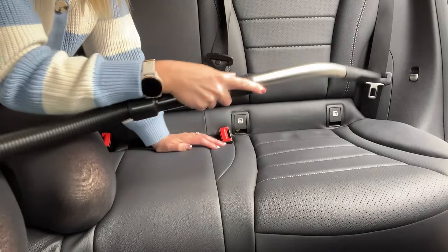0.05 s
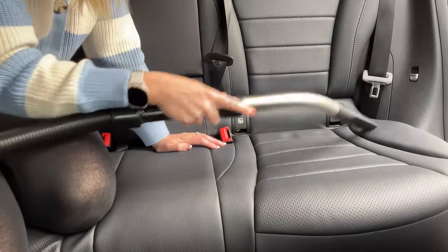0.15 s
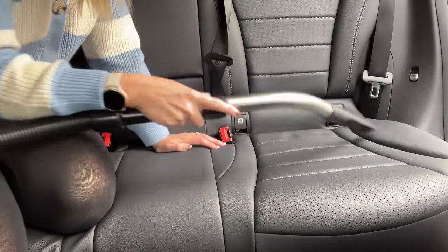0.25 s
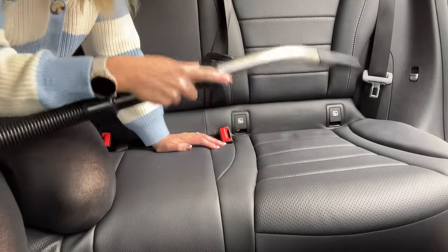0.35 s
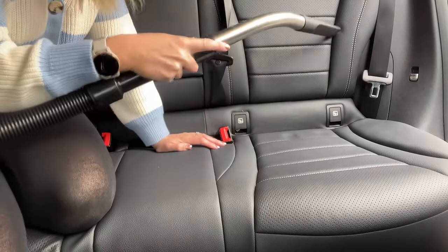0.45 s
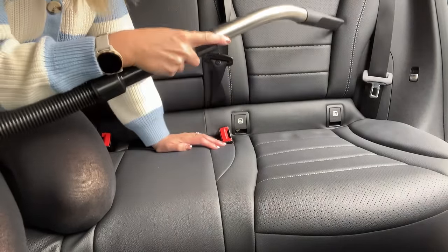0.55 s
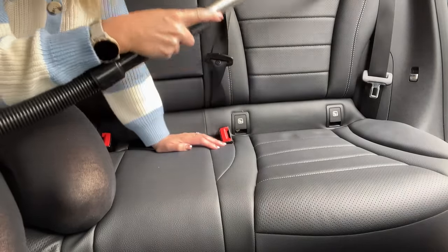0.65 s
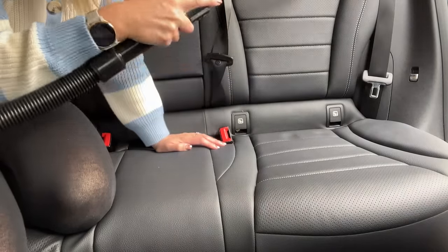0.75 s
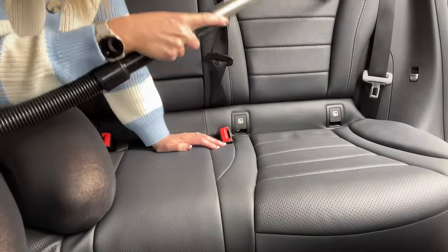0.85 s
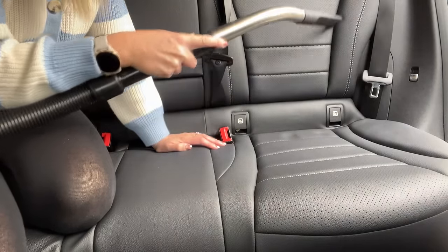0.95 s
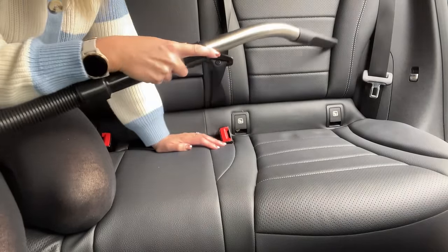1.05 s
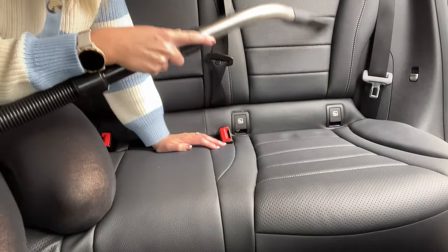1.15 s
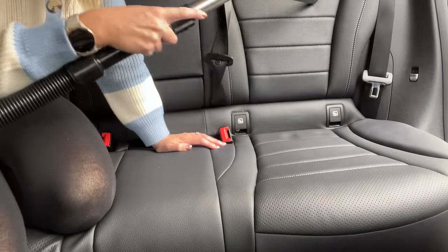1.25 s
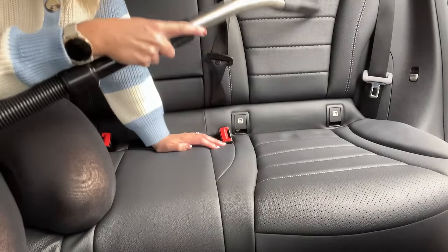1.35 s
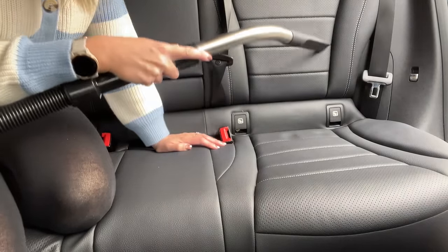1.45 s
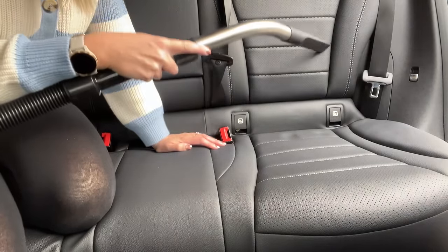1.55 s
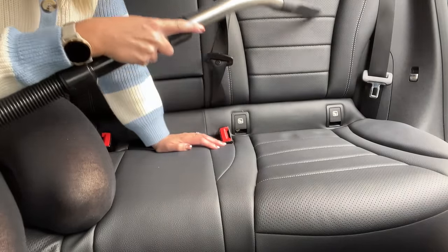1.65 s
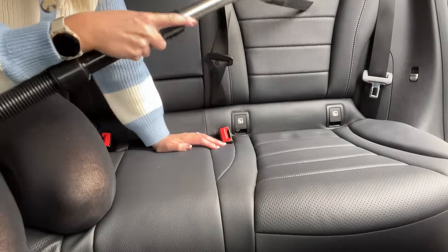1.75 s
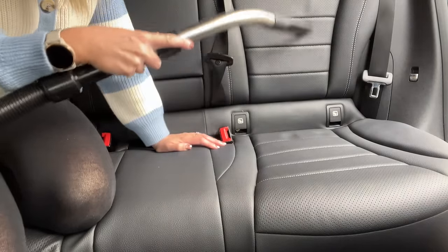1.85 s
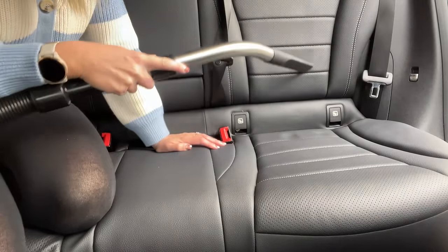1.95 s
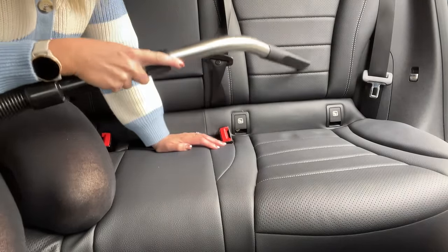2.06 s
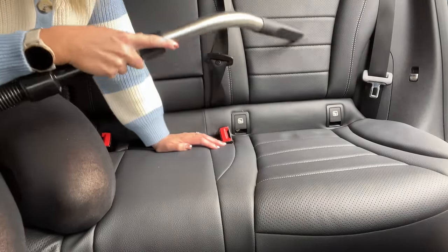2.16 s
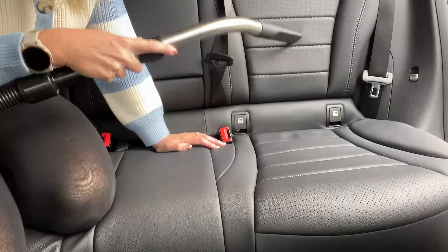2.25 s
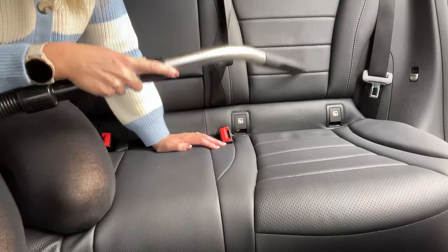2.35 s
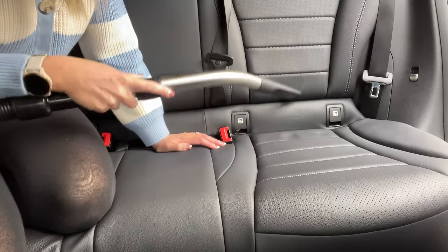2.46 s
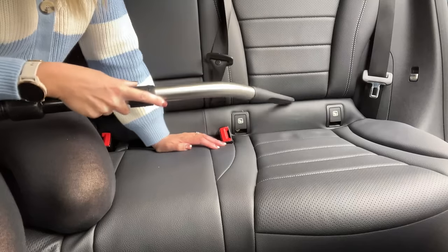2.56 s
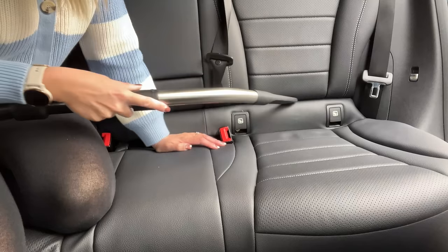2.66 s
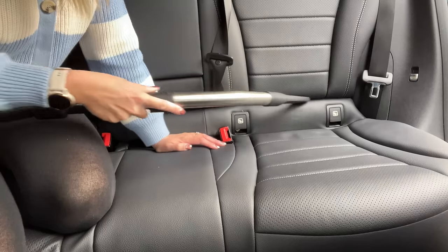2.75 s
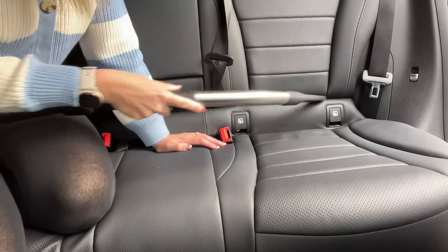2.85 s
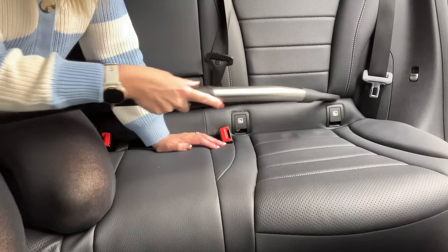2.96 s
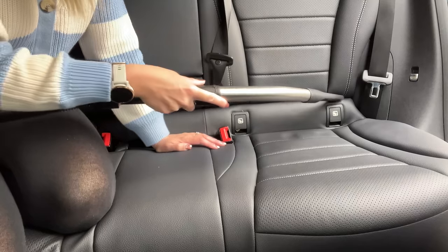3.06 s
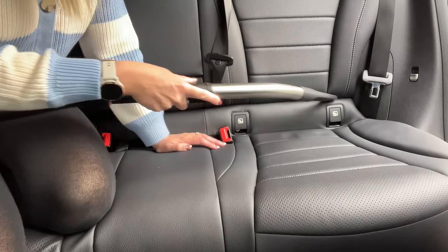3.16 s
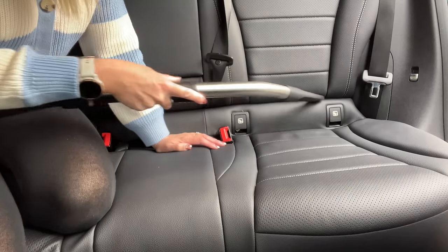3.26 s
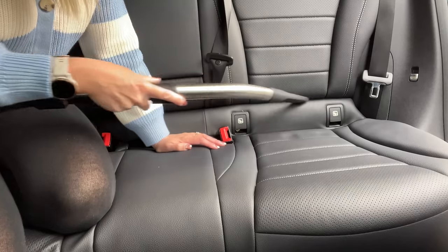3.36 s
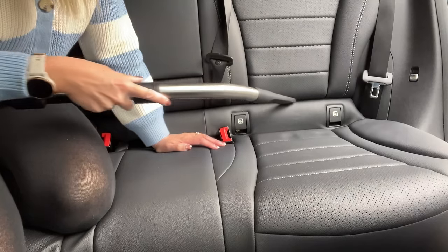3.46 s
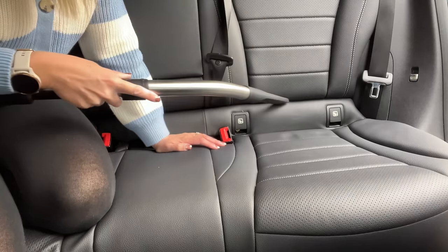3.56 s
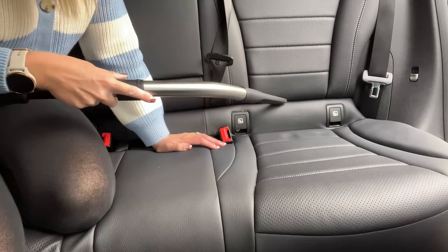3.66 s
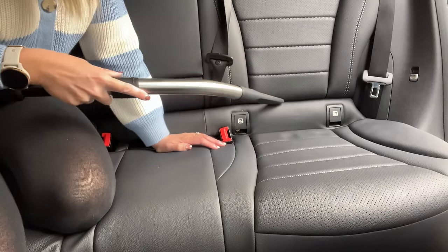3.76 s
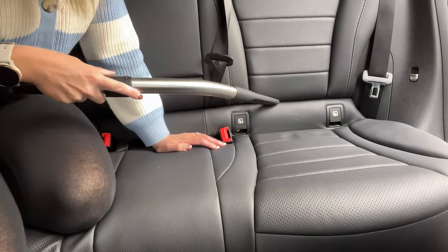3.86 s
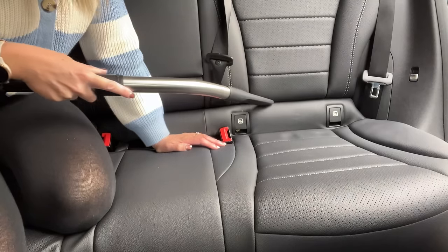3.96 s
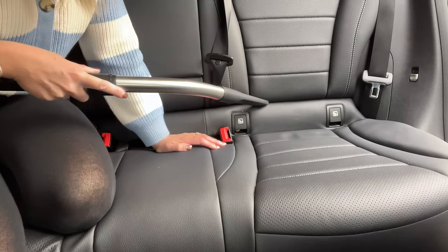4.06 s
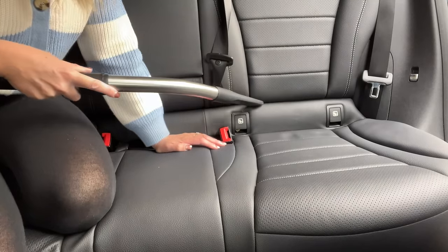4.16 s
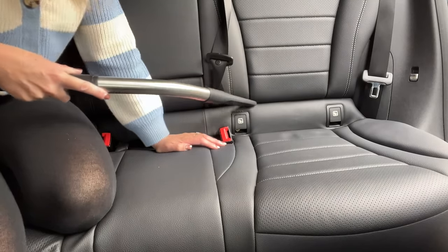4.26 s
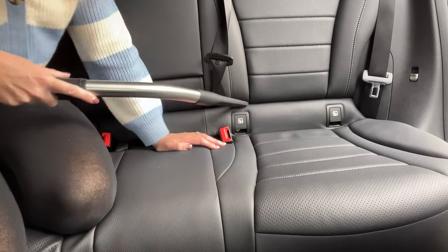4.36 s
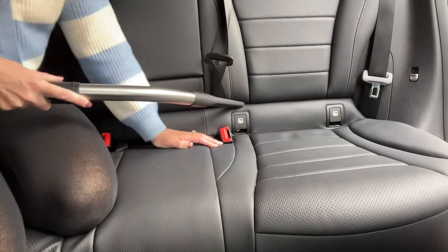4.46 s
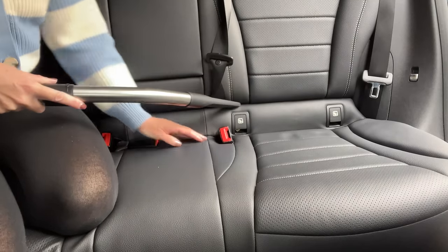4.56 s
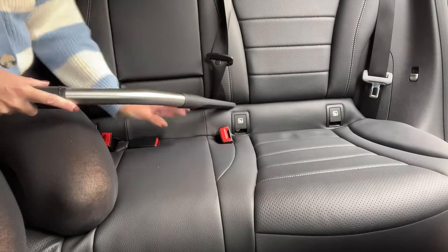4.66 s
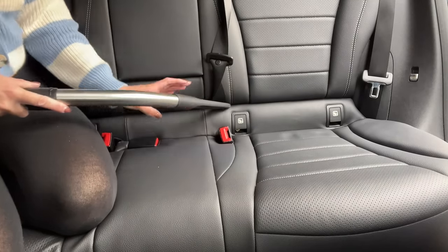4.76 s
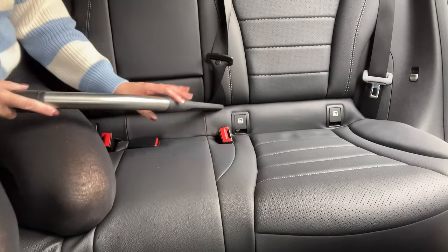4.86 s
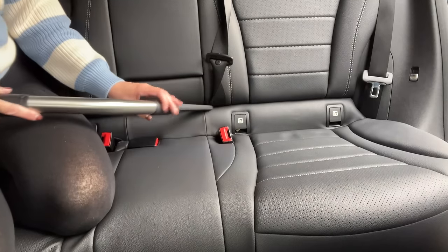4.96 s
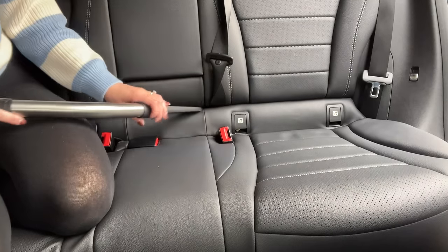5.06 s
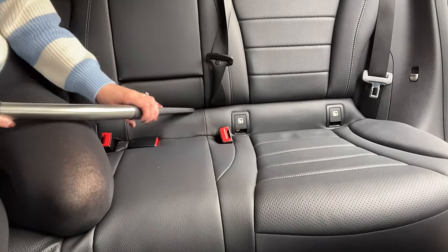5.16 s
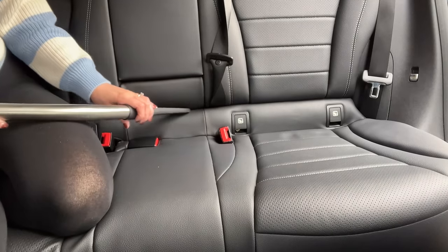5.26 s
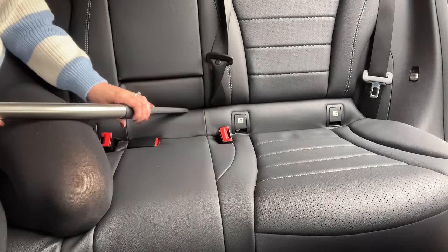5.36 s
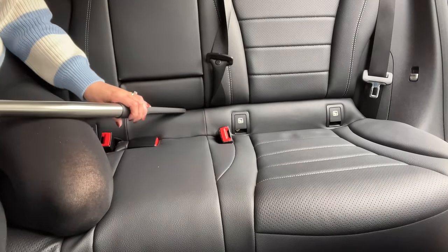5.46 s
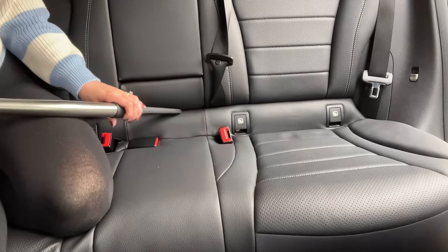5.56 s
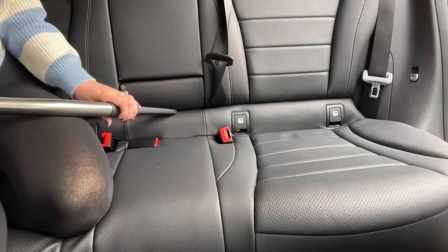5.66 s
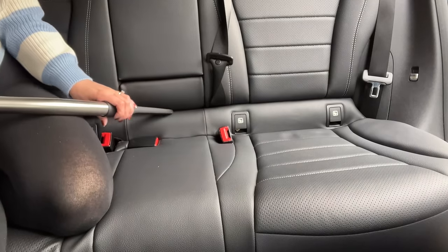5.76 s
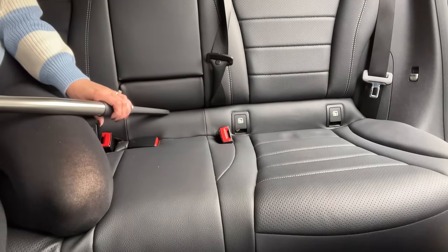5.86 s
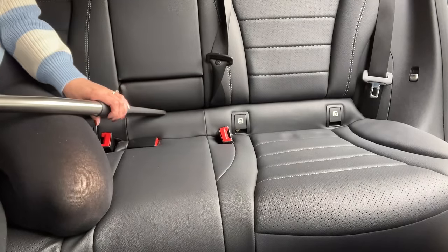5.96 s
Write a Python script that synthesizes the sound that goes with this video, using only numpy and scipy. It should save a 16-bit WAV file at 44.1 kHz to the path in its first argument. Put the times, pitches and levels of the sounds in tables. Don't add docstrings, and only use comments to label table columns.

```python
import sys
import numpy as np
from scipy import signal
from scipy.fft import rfft, irfft
from scipy.io import wavfile
from scipy.ndimage import map_coordinates

SR = 44100
rng = np.random.default_rng(int(sys.argv[2]) if len(sys.argv) > 2 else 0)


def generate_wav(sig):
    pcm = np.round(np.clip(np.atleast_2d(sig).T, -1, 1) * 32767).astype(np.int16)
    wavfile.write(sys.argv[1], SR, pcm)


def to_linear_factor(level_db):
    exponent = np.asarray(level_db, float) / 20
    return 10 ** exponent


N = 265041
T = np.arange(N) / SR

# t/s, flow heard as hiss level/dB, gap width as coarse rush over hiss/dB
FLOW = [(0, -45, 11), (.06, -44, -7.5), (.3, -38, -2), (.8, -37, -12), (1.3, -41, -10), (1.8, -40, -15),
        (2.3, -40.5, -13), (2.52, -32.5, -14.5), (2.56, -33.5, -8.5), (2.8, -30, -15.5), (3.05, -28.5, -6),
        (3.45, -30.5, -12), (3.7, -28, -11), (4.34, -26.5, -14.5), (4.38, -31, -11.5), (4.85, -25, -8.5),
        (5.2, -23.5, -6), (6.01, -22, -14.5)]
# t/s, length/s, hiss level/dB, coarse rush level/dB
TOUCHES = [(.055, 0.095, 13, 12), (.17, 0.11, 13.5, 7), (.33, 0.22, 1.5, 1.5), (.455, 0.17, 10.5, 15),
           (.61, 0.082, 8, 15.5), (.87, 0.082, 4, 12), (.93, 0.021, 14.5, 18), (.96, 0.27, 16, 26),
           (1.14, 0.079, -2.5, -3.5), (1.395, 0.053, 11, 12), (1.46, 0.18, 11, 17), (1.595, 0.12, 6, 5.5),
           (1.85, .04, 3.5, 4), (1.92, 0.074, 4.5, 7.5), (2.005, 0.16, 9.5, 12.5), (2.15, 0.037, 10.5, 12),
           (2.32, 0.024, -1, -12), (2.4, 0.04, 10, 5), (2.46, 0.042, 4, 3), (2.54, 0.12, 7, 1.5),
           (2.93, 0.069, 3, 8), (3.08, 0.13, 2.5, 1), (3.14, 0.15, 3.5, 9), (3.38, .04, -0.5, -1),
           (3.515, 0.092, 5, 17.5), (3.68, 0.067, 2.5, 3.5), (3.95, 0.26, -2, -2), (4.83, 0.11, 2, 4.5),
           (5.0, 0.092, 5.5, 0), (5.2, 0.084, 3, 1.5), (5.66, 0.11, -0.5, -1.5), (5.76, 0.02, 2.5, 1),
           (4.63, 0.034, 3.5, 1.5), (.7, 0.027, 5, 0), (.75, 0.097, -2, 1), (1.21, .03, 2, 2),
           (1.34, 0.044, 0, 3), (1.73, 0.13, -0.5, -6), (4.38, 0.14, 0.5, 1.5), (5.5, 0.17, 2, 1.5)]
# t/s, length/s, roar level/dB
SEALS = [(.1, 0.35, 13.5), (.22, 0.11, -3.5), (.46, 0.08, 3.5), (.56, 0.15, 3), (.65, 0.035, 8.5),
         (.9, 0.37, 10.5), (1.41, 0.31, 10), (1.6, 0.032, 4.5), (1.85, 0.032, 6), (1.93, 0.11, 6.5),
         (2.03, 0.13, 7), (2.15, 0.02, 7), (2.32, 0.032, 6.5), (2.385, 0.061, 14), (2.46, 0.061, 14),
         (2.5, 0.028, 2), (2.98, 0.18, 10), (3.53, 0.038, 8), (4.99, 0.081, 11)]
LAYER_HZ = [700, 2500, 6500, 14000]
# f/Hz, level/dB per Hz
STREAM_COLOUR = [(200, -19), (280, -11.5), (400, -0.5), (600, -6), (900, -3.5), (1400, -2.5), (2000, -1.5),
                 (3500, -3.5), (5500, -6), (8000, -6.5), (10000, -8.5), (13000, -9.5), (14500, -13.5),
                 (16000, -39)]
# t/s, lower f/Hz, level/dB, upper f/Hz, level/dB
CAVITY = [(0, 6800, 0.5, 11200, 4.5), (.36, 6700, -5, 12500, 2), (.6, 6000, 1, 11500, 1.5),
          (1.0, 5700, 0, 10000, 1.5), (2.4, 7500, -5, 11300, -2), (2.6, 7550, 5, 16000, 13.5),
          (2.85, 9400, 8, 14700, 5), (3.05, 9200, 4.5, 12100, 7), (3.3, 9350, 7.5, 14600, 7),
          (3.55, 7240, 8.5, 13700, 7.5), (3.75, 7800, 4.5, 13300, 5.5), (3.95, 7100, 7, 13200, 9),
          (4.3, 6560, 4.5, 13200, 2.5), (4.55, 7750, 7, 11900, 3.5), (4.8, 9100, 2.5, 11200, 1.5),
          (5.1, 7300, 5, 10900, 2.5), (5.6, 8460, 7, 11000, -1), (6.01, 8200, 2, 14000, -10)]
# t/s, length/s, level/dB
LOWER_SWELLS = [(.1, 0.073, 6), (.3, 0.083, -6), (.6, 0.31, 4.5), (1.08, 0.075, -0.5), (1.44, 0.1, -3.5),
                (1.95, 0.3, -6), (2.46, 0.11, 2), (2.92, 0.24, -5), (3.5, 0.07, 1), (3.98, 0.082, 2),
                (4.63, 0.083, 1), (4.82, 0.093, -1), (4.95, .06, 0), (5.55, .1, -1.5)]
# t/s, length/s, level/dB
UPPER_SWELLS = [(.45, 0.095, -2.5), (.72, 0.25, 0), (1.04, 0.13, 0.5), (1.26, .1, 1.5), (1.74, .08, -7),
                (1.96, 0.11, 3), (2.45, 0.069, 2), (2.74, 0.31, 2), (3.34, 0.083, 0), (3.98, 0.35, 2.5),
                (5.55, 0.31, 1)]
# t/s, level/dB, length/s
PUFFS = [(0.134, 11, 0.0095), (0.374, 2, 0.027), (2.412, 5, .008), (5.49, 2, 0.014), (5.615, -4, 0.013),
         (5.646, -3, 0.013), (5.78, 2.5, .025), (5.808, -3.5, 0.03), (5.977, -0.5, 0.016),
         (0.27, 6.5, 0.013), (0.476, 4.5, 0.069), (1.699, 9.5, 0.031), (1.88, 11, 0.01), (1.94, 8, 0.012),
         (2.171, 4.5, 0.0072), (2.343, 17, 0.012), (2.546, 12.5, 0.0048), (2.956, 0.5, 0.016),
         (3.183, -2, 0.018), (4.334, 3.5, 0.0076), (5.503, 0, 0.018), (5.666, 1, 0.02), (5.74, 1, 0.012),
         (5.86, -3, 0.0081)]
# f/Hz, width/Hz, level/dB
WAND = [(193.5, 21.6, 20.5), (520, 244, 6), (725, 14, 7.5), (862, 24, 6), (1021, 91, 4), (1930, 230, 3.5),
        (2400, 400, -1.5), (2507, 50, 6)]
# t/s, length/s, start f/Hz, end f/Hz, level/dB
WHISTLES = [(.134, .0045, 2700, 7000, -17.5), (.645, .03, 4700, 4900, -32), (2.424, .012, 4100, 4150, -27),
            (2.527, .024, 1000, 1060, -29), (3.54, .05, 2000, 2000, -35), (4.865, .045, 4500, 4000, -24),
            (4.915, .025, 3750, 3750, -25), (.39, .045, 960, 1000, -38), (4.925, .035, 1950, 2100, -27),
            (5.0, .04, 1000, 900, -36), (5.07, .062, 4350, 3780, -25), (5.066, .018, 4950, 4850, -24),
            (5.135, .032, 4850, 4850, -24), (5.49, .022, 4100, 4050, -26)]
# t/s, length/s, start f/Hz, end f/Hz, level/dB
WHOOSHES = [(.17, .28, 750, 850, -33), (.1, .09, 900, 1000, -33), (.47, .1, 1150, 1150, -37),
            (.47, .07, 1900, 2100, -33), (.97, .09, 3800, 4000, -28), (1.0, .2, 4750, 4700, -31),
            (1.06, .17, 4300, 4000, -31), (3.14, .12, 4000, 3900, -29), (2.405, .032, 3900, 4200, -31),
            (2.47, .085, 900, 1000, -30), (2.47, .085, 450, 450, -33), (5.2, .14, 1650, 1900, -33),
            (5.67, .05, 10000, 9000, -25), (5.82, .04, 6500, 6500, -27), (5.77, .03, 10000, 10000, -23)]
# t/s, length/s, start f/Hz, end f/Hz, level/dB
THUDS = [
    (0, 0.039, 57, 56.4, -45),
    (.147, 0.019, 93, 80, -47),
    (.665, 0.037, 207, 190, -49),
    (1.661, 0.063, 225, 163, -53.5),
    (1.716, 0.051, 60.3, 63.6, -48.5),
    (1.88, 0.097, 184, 195, -46.5),
    (2.16, 0.062, 108, 110, -58),
    (2.95, 0.16, 205, 200, -60.5),
    (5.007, 0.081, 308, 336, -54),
]
# t/s, left port lag/ms, seat echo delay/ms, echo share/0-1
PLACE = [(0, .27, .95, .2), (.3, .26, .8, .2), (.45, .205, .85, .45), (.7, .2, .74, .35),
         (1.0, .195, .85, .4), (1.95, .187, .88, .3), (2.04, .185, .6, .6), (2.15, .18, .8, .3),
         (2.7, .175, .81, .4), (3.05, .22, .85, .3), (3.4, .18, .82, .35), (3.9, .143, .85, .25),
         (4.3, .095, .7, .25), (5.0, .05, .7, .25), (5.1, .035, 1.24, .55), (5.6, -.034, 1.09, .6),
         (6.01, -.045, .97, .5)]
# left port lag/ms, left minus right level/dB
SHADE = [(-.045, -1.8), (.035, -1.4), (.07, .3), (.19, .25), (.26, -.5)]
# f/Hz, direct share/0-1, left minus right level/dB, left lead/rad
PORTS = [(250, .95, 1, .4), (400, .97, 2.3, .4), (480, .9, 2, .1), (570, .7, 0, -1.9), (720, .4, -3.5, .6),
         (900, .7, -3, -.3), (1500, .7, -2, 0), (2200, .55, -1, -.5), (2900, .3, -1.5, .1),
         (4000, .4, -3, -.2), (5500, .3, -4, -.2), (7000, .45, -4, 0), (9000, .8, -4, 0)]
# t/s, lower f/Hz, level/dB, upper f/Hz, level/dB
HOLLOWS = [(0, 1590, -10, 2160, -9), (.5, 1640, 4.5, 3070, -3), (.8, 1510, -17, 2830, 0.5),
           (1.1, 1540, 1, 2870, 0), (1.6, 1570, -1, 3560, 0), (1.95, 1580, -7, 2800, -1),
           (2.1, 1680, -8, 2750, -9), (2.3, 1640, -5, 2440, -1), (2.6, 1660, -5, 2170, -6),
           (2.85, 1470, -6, 1910, -14), (3.1, 1570, -12, 2130, -35), (3.3, 1540, -4, 1900, -2),
           (3.5, 1600, -16, 2250, -14), (3.55, 1600, -14, 2500, -18), (3.7, 1580, -7, 2200, -13),
           (4.0, 1650, -8, 2210, -7), (4.5, 1600, 2, 2280, -3), (4.8, 1610, -1, 2250, -6),
           (5.0, 1590, 2.5, 2470, 0.5), (6.01, 1570, 2, 2600, 8)]
# t/s, ridge f/Hz, level/dB, trough f/Hz, level/dB
RIDGES = [(0, 1970, -2, 2950, 0), (.9, 2000, -8, 3000, -1), (1.3, 1950, -2, 3000, 1),
          (2.3, 1900, -8, 3000, 5), (2.9, 1850, 2, 3100, -4), (3.4, 1890, -1, 3020, 0),
          (3.65, 1934, 3.5, 2650, -14), (4.7, 1910, 4.5, 2790, -10), (5.2, 1910, 0, 2960, -3),
          (6.01, 1990, -6, 2920, 7)]
# t/s, left level/dB, right level/dB
STANDING = [(0, 12, 6), (.2, 7, 4), (.4, -4, 8.5), (.7, -8, 4), (.95, -15, -1), (1.15, -6, 4),
            (1.3, -22, -9), (1.9, -3, -2), (2.3, 2, 2.5), (2.7, 17, 14), (3.1, 5, 11), (3.6, 6, 4),
            (3.9, 10, 5), (4.25, 10.5, 5), (4.7, 11, 1), (5.2, 17, 5), (5.6, 14, 4), (6.01, 12, -6)]
# f/Hz, width/Hz, level/dB
PANELS = [(670, 70, 1), (820, 60, 0), (1183, 42, -1.5), (1216, 78, 3.5), (1500, 33, 3.5), (1640, 41, -0.5),
          (2250, 80, 0.5), (3580, 87, -1), (3970, 80, -1), (4600, 130, -0.5), (4800, 160, 1)]
# f/Hz, level/dB per Hz
EXHAUST_COLOUR = [(250, -11), (470, 6.5), (1000, -30), (1600, -3), (2300, 4), (3200, -2), (5000, 1.5),
                  (12000, 9), (16000, 2)]
# f/Hz, level/dB per Hz
RUMBLE_COLOUR = [(13, -42), (22, -28), (48, 3), (91, 5), (109, 1.5), (151, -6), (198, -3), (275, -15.5),
                 (300, -21), (390, -41), (660, -120)]
# t/s, length/s, level/dB
KNOCKS = [(.1, 0.15, 8), (.45, 0.089, 5), (.65, 0.054, 12.5), (.84, 0.23, 5), (1.1, 0.14, 6),
          (1.4, 0.17, 11.5), (1.65, 0.098, 13.5), (1.87, 0.17, 11), (2.16, 0.027, 17), (2.3, 0.28, 9),
          (2.84, 0.12, 9), (3.27, 0.33, 8), (3.54, 0.11, 2.5), (3.72, 0.034, 13), (3.81, 0.021, 14),
          (4.15, 0.14, 3), (4.5, .1, 7), (5.0, 0.052, 6), (5.27, 0.11, 3), (5.52, 0.09, 2)]
# f/Hz, level/dB
MAINS = [(99.5, -59)]


def stream():
    levels, cavity = stream_levels(), in_time(CAVITY)
    lower_swell_db, upper_swell_db = presses(LOWER_SWELLS, sag=0), presses(UPPER_SWELLS, sag=0)
    puff_db = sum(db * np.exp(-2 * ((T - s) / length) ** 2) for s, db, length in PUFFS)
    gust_db = .6 * drift(9) + 1.2 * drift(115)

    def gain_db(hz):
        share = [np.interp(np.log(hz), np.log(LAYER_HZ), row) for row in np.eye(4)]
        level = share @ levels + at_hz(STREAM_COLOUR, hz) + 15.5
        level = level + sum(share[1:]) * puff_db + gust_db
        level = level + bump(hz, cavity[0], .22, cavity[1]) + bump(hz, cavity[2], .22, cavity[3])
        return level + bump(hz, 1340, .44, lower_swell_db) + bump(hz, 3470, .21, upper_swell_db)

    air = bands(np.geomspace(170, 19000, num=35), gain_db, patchy_db=1.0, rate=17.0)
    pipe_db = resonances(WAND, np.fft.rfftfreq(N, 1 / SR))
    return irfft(rfft(air) * to_linear_factor(pipe_db), N)


def stream_levels():
    flow_db, gap_db = in_time(FLOW)
    touch_db, seal_db = presses(TOUCHES, sag=.31), presses(SEALS, sag=.19)
    swing_db = flow_db + 25
    roar = -47.5 + .029 * swing_db + seal_db
    rush = flow_db + gap_db + presses(TOUCHES, sag=.54, axis=3)
    hiss = flow_db + touch_db
    fine = -36.5 + .78 * swing_db - .83 * gap_db + touch_db - .43 * seal_db
    return np.array([roar, rush, hiss, fine])


def whistles():
    return sum(glide(row, width_hz=.05 * row[2]) for row in WHISTLES)


def whooshes():
    return sum(glide(row, width_hz=550) for row in WHOOSHES)


def thuds():
    return sum(glide(row, width_hz=.05 * row[2]) for row in THUDS)


def seat_echoes(nozzle, echo_ms, echo):
    bright = signal.sosfilt(signal.butter(1, 5500, "high", fs=SR, output="sos"), nozzle)
    return .6 * echo * (delayed(bright, echo_ms) + .6 * delayed(bright, .64 * echo_ms))


def cabin(x, count=61):
    t60_s = .065
    t, out, step = np.arange(int(.12 * SR)) / SR, np.zeros((2, N)), N / (count - 1)
    tails = rng.standard_normal((count, 2, len(t))) * to_linear_factor(-60 * t / t60_s) * (t > .001)
    for k, tail in enumerate(tails):
        a, b = max(int((k - 1) * step), 0), min(int((k + 1) * step), N)
        part = x[a:b] * np.cos(np.pi / 2 * (np.arange(a, b) / step - k))
        tail = tail / np.linalg.norm(tail, axis=1, keepdims=True)
        wet = signal.fftconvolve(part[None], tail, axes=1)
        out[:, a:a + wet.shape[1]] += wet[:, :N - a]
    return out


def standing_waves(x):
    hz, s, z = signal.stft(x, SR, nperseg=1024)
    at = np.clip((s * SR).astype(int), 0, N - 1)
    pitch_hz = hz[:, None] + 1
    colour_db = resonances(PANELS, hz[:, None])
    for rows, width in ((HOLLOWS, .086), (RIDGES, .028)):
        low_hz, low_db, high_hz, high_db = [c[at] for c in in_time(rows)]
        colour_db = colour_db + bump(pitch_hz, low_hz, width, low_db) + bump(pitch_hz, high_hz, width, high_db)
    sides_db = np.array([c[at] for c in in_time(STANDING)])[:, None]
    wave_db = bump(pitch_hz, 729, .07, sides_db)
    return signal.istft(z * to_linear_factor(colour_db + wave_db), SR, nperseg=1024)[1][:, :N]


def exhaust():
    edges = np.geomspace(250, 18000, num=15)
    air, own = [rms_one(bands(edges, lambda hz: at_hz(EXHAUST_COLOUR, hz), patchy_db=2.5, rate=1.5))
                for _ in "ab"]
    low, high = [signal.butter(4, 520, kind, fs=SR, output="sos") for kind in ("low", "high")]
    own = signal.sosfilt(high, own) + signal.sosfilt(low, air)
    late = delayed(air, np.full(N, .263))
    return to_linear_factor(-33.5) * np.array([.37 * late + .8 * own, air])


def rumble():
    edges, alike = np.geomspace(20, 320, num=11), .55
    mid, side = [rms_one(bands(edges, lambda hz: at_hz(RUMBLE_COLOUR, hz), patchy_db=2.0, rate=3.7))
                 for _ in "ms"]
    low = np.sqrt(1 + alike) * mid + np.sqrt(1 - alike) * side * np.array([[1], [-1]])
    level_db = -44 - 2 * T + presses(KNOCKS, sag=.52)
    hum = sum(to_linear_factor(db + 7.0) * np.sin(2 * np.pi * hz * T) for hz, db in MAINS)
    return low * to_linear_factor(level_db + np.array([[-2.2], [-1.3]])) + hum * to_linear_factor(4.0 * drift(11))


def glide(row, width_hz):
    s, length, start_hz, end_hz, db = row
    u = np.linspace(0, 1, int(length * SR))
    r = np.exp(-np.pi * width_hz / SR)
    steady = 1.2 * np.exp(-(width_hz / 400) ** 2)
    chance = rng.standard_normal((2, 16000))
    wobble = signal.lfilter([1], [1, -2 * r, r * r], chance[0] + 1j * chance[1])[-len(u):]
    phase = 2 * np.pi * np.cumsum(start_hz + (end_hz - start_hz) * u) / SR
    tone = np.real((steady + wobble / np.std(wobble)) * np.exp(1j * phase))
    out = np.zeros(N)
    out[int(s * SR):][:len(u)] += to_linear_factor(db) * np.sin(np.pi * u) ** .5 * tone
    return out


def presses(rows, sag, axis=2):
    attack_s, release_s, gain_db = .028, .04, 0
    for row in rows:
        end_s = max(row[1], attack_s + 1e-3)
        corners_s = [0, attack_s, end_s, end_s + release_s]
        gain_db = gain_db + row[axis] * np.interp(T - row[0], corners_s, [0, 1, 1 - sag, 0])
    return gain_db


def bands(edges, gain_db, patchy_db, rate):
    white, out = rng.standard_normal((2, N)), 0
    for k, (low, high) in enumerate(zip(edges, edges[1:])):
        band = signal.sosfilt(signal.butter(2, [low, high], "band", fs=SR, output="sos"), white[k % 2])
        out = out + band * to_linear_factor(gain_db(np.sqrt(low * high)) + patchy_db * drift(rate))
    return out


def drift(rate):
    r = np.exp(-80 * np.pi * rate / SR)
    slow = signal.lfilter([1], [1, -2 * r, r * r], rng.standard_normal(N // 40 + 2002))[2000:]
    return np.interp(np.arange(N) / 40, np.arange(len(slow)), rms_one(slow))


def bump(hz, centre_hz, width, db):
    return db * np.exp(-(np.log(hz / centre_hz) / width) ** 2)


def resonances(rows, hz):
    return sum(db / (1 + ((hz - f) / (width / 2)) ** 2) for f, width, db in rows)


def delayed(x, ms):
    return map_coordinates(x, [np.arange(N) - ms * SR / 1000], order=3, mode="mirror")


def in_time(rows):
    s, *columns = np.transpose(rows)
    return [np.interp(T, s, c) for c in columns]


def at_hz(points, hz, axis=1):
    return np.interp(np.log(hz + 1e-9), np.log(np.array(points)[:, 0]), np.array(points)[:, axis])


def rms_one(x):
    return x / np.sqrt(np.mean(x ** 2) + 1e-20)


def scene():
    lag_ms, echo_ms, echo = in_time(PLACE)
    tones = whistles() + whooshes() + thuds()
    nozzle = stream() + tones
    nozzle = nozzle + seat_echoes(nozzle, echo_ms, echo)
    beamed = .5 * tones
    aimed = nozzle + beamed

    hz = np.fft.rfftfreq(N, 1 / SR)
    share = np.clip(at_hz(PORTS, hz), 0, 1)
    tilt = to_linear_factor(at_hz(PORTS, hz, axis=2) / 2 * np.array([[1], [-1]]))
    direct = rfft([delayed(aimed, lag_ms), aimed])
    direct[0] *= np.exp(1j * at_hz(PORTS, hz, axis=3))
    direct = irfft(tilt * np.sqrt(share) * direct, N)
    wet = irfft(tilt * np.sqrt(1 - share) * rfft(cabin(nozzle - beamed)), N)

    near = T > 4.8
    heard = direct * to_linear_factor(.43 * near) + wet * to_linear_factor(-2.5 * near)
    heard[0] *= to_linear_factor(np.interp(lag_ms, *np.transpose(SHADE)))
    return standing_waves(heard + exhaust()) + rumble()


def band_limit(x):
    return signal.sosfilt(signal.butter(12, 15780, fs=SR, output="sos"), x)


def record(dry):
    hz = np.fft.rfftfreq(N, 1 / SR)
    fade_db = np.interp(T, [0, .06], [-10, 0])
    rounded = 1.2 * np.tanh(dry / 1.2)
    left, right = rfft(rounded * to_linear_factor(fade_db))
    single = 1.35 / (1 + np.exp((7770 - hz) / 594))
    turn = np.exp(2j * np.pi * (hz - 11600) / 7900)
    left = np.cos(single) * left + np.sin(single) * right * turn
    lost = (left + right) / 2 / (1 + np.exp((14680 - hz) / 70))
    return band_limit(irfft([left - lost, right - lost], N))


dry = scene()
out = record(dry)
generate_wav(out)
```